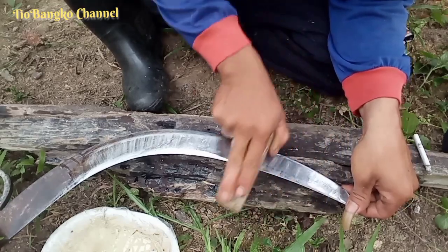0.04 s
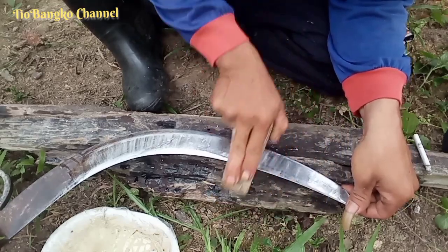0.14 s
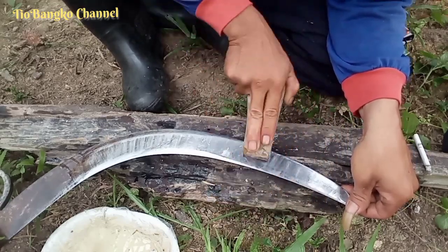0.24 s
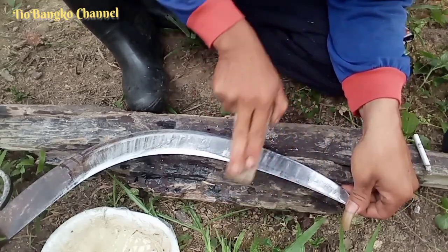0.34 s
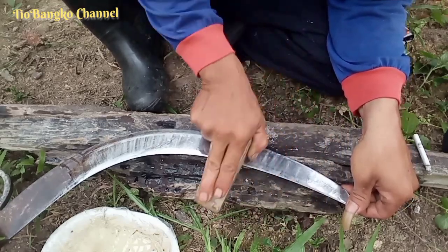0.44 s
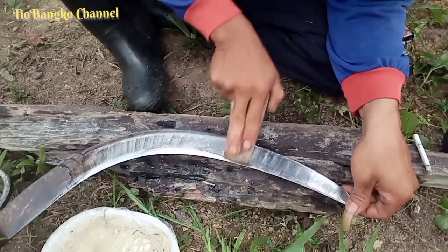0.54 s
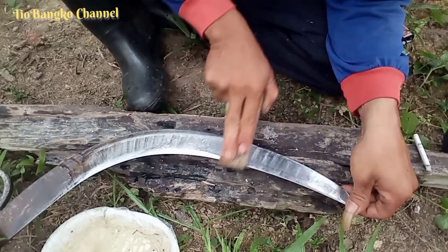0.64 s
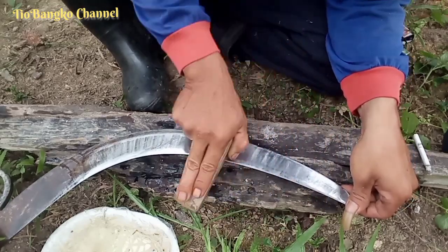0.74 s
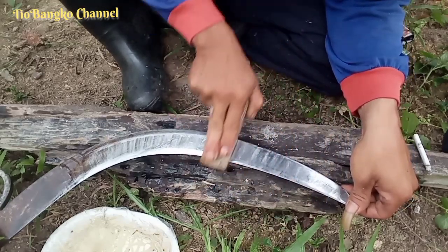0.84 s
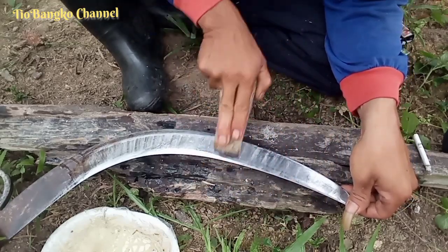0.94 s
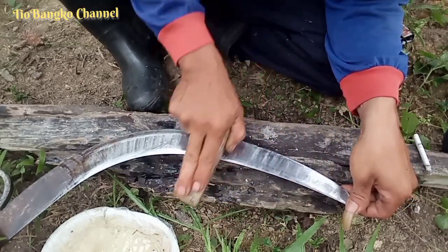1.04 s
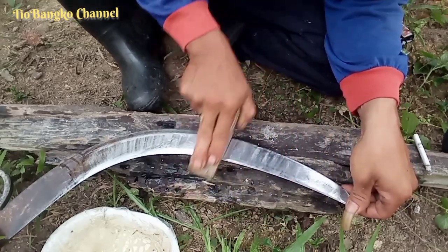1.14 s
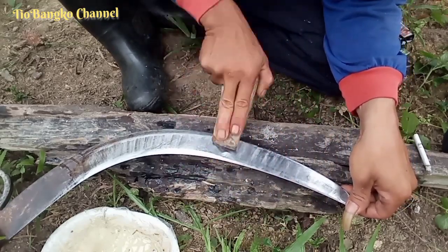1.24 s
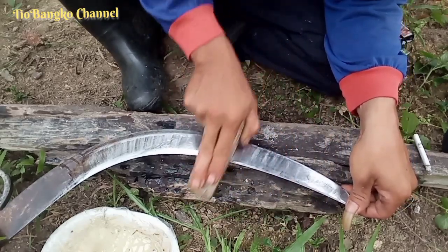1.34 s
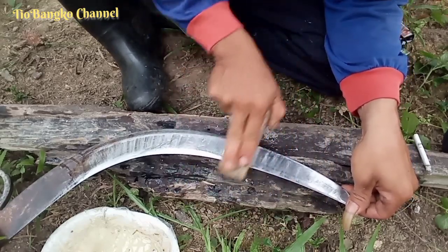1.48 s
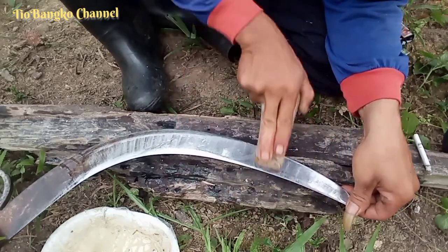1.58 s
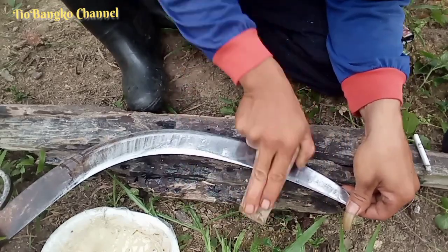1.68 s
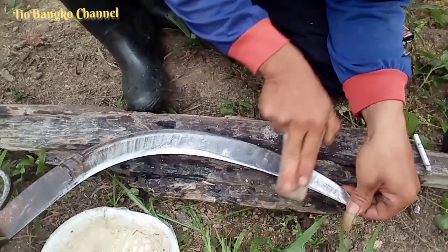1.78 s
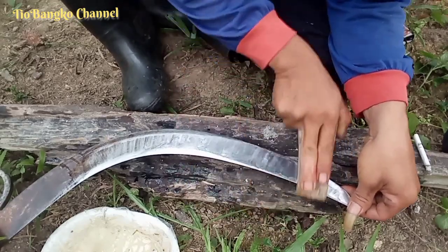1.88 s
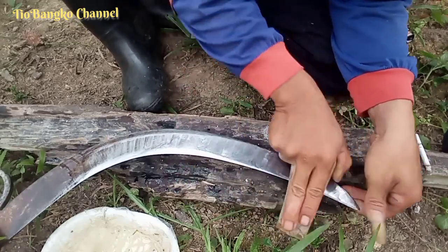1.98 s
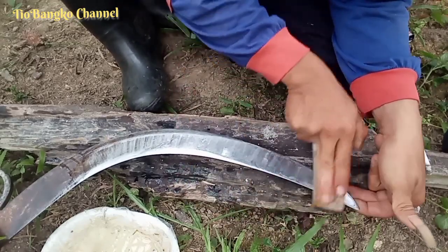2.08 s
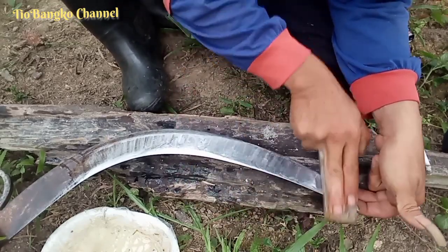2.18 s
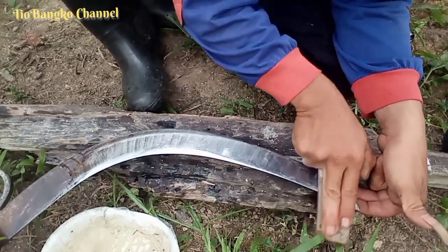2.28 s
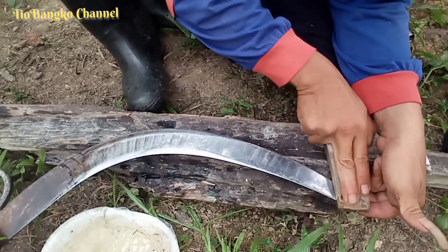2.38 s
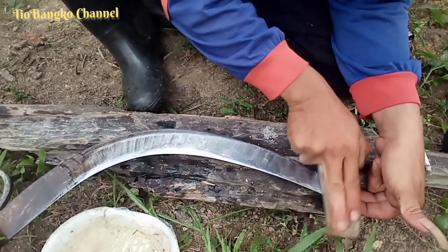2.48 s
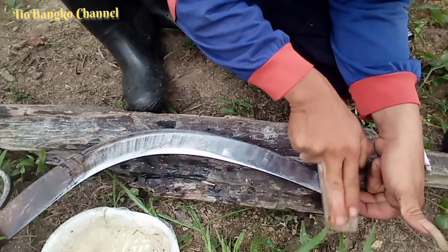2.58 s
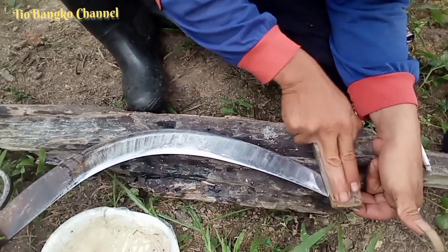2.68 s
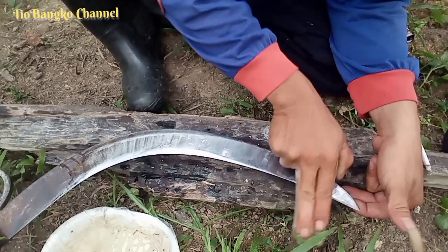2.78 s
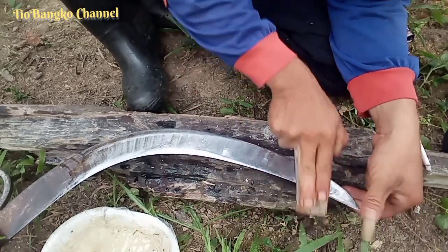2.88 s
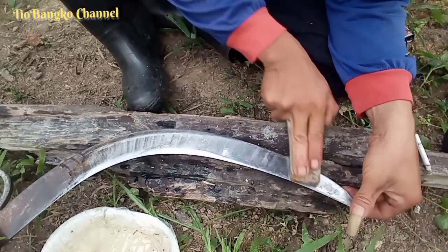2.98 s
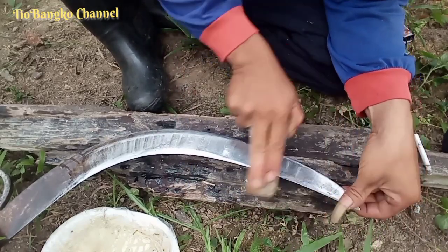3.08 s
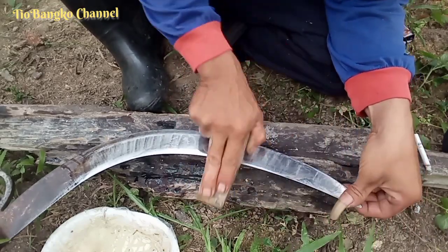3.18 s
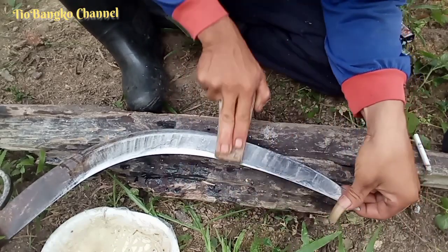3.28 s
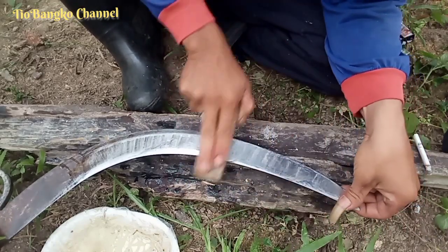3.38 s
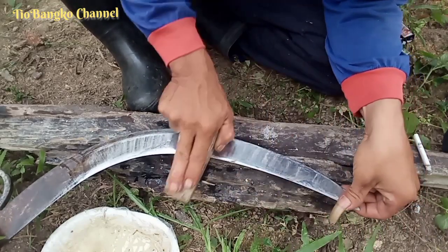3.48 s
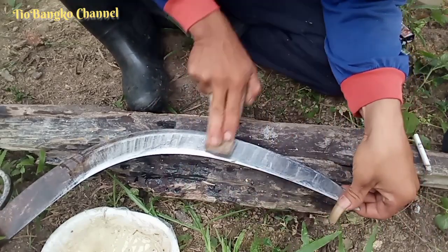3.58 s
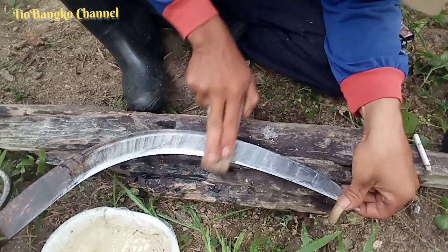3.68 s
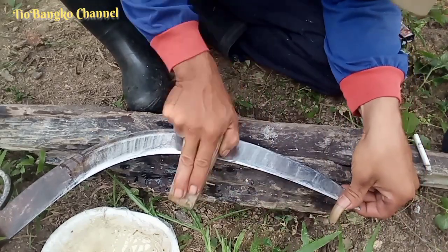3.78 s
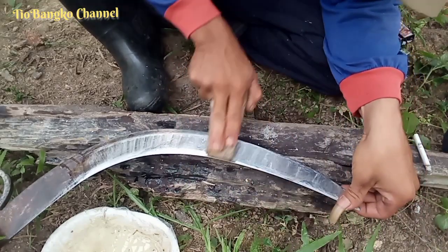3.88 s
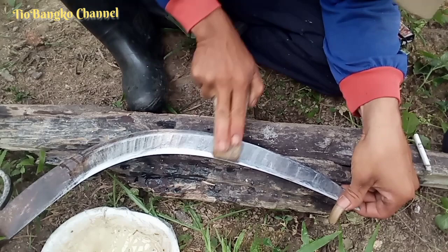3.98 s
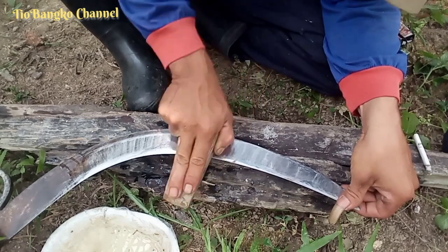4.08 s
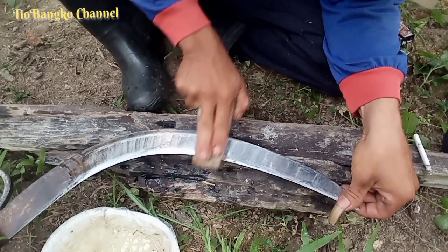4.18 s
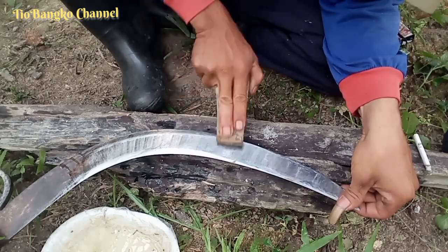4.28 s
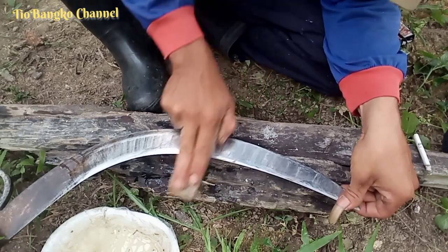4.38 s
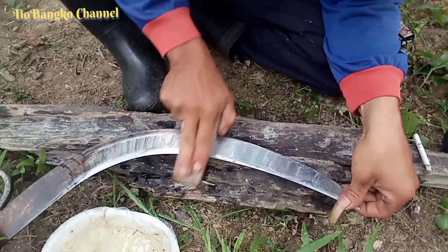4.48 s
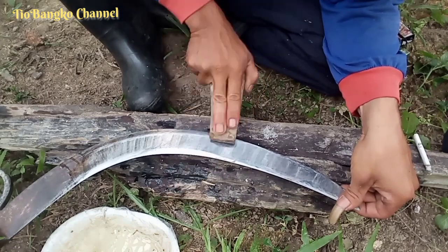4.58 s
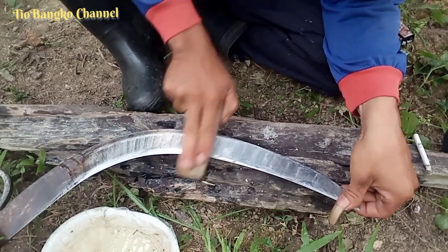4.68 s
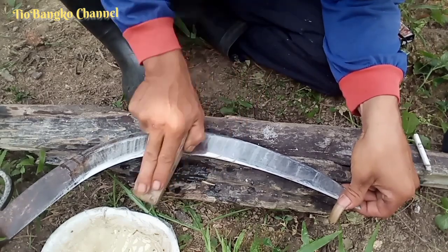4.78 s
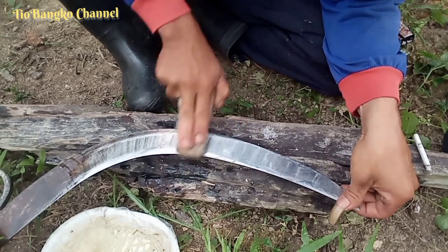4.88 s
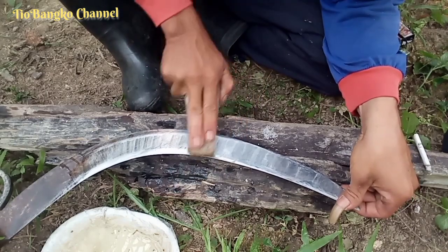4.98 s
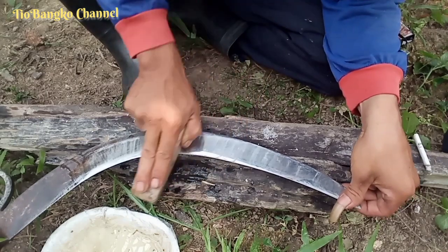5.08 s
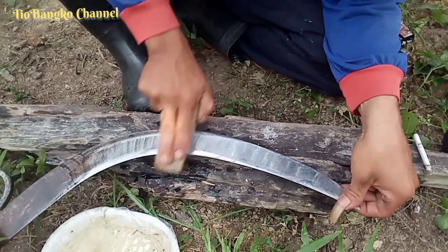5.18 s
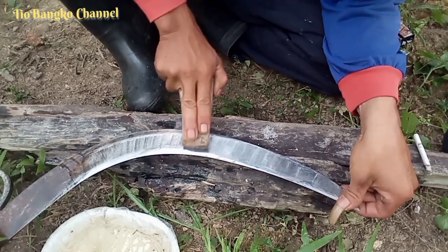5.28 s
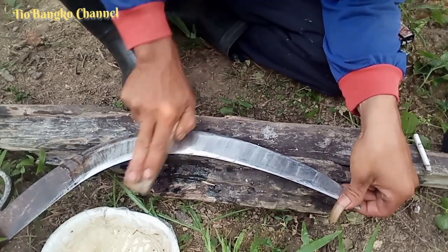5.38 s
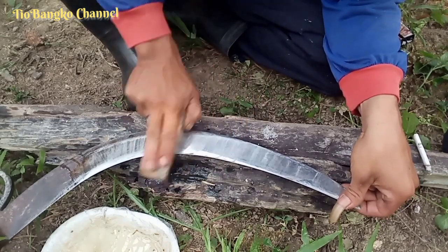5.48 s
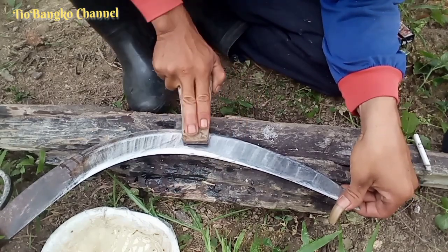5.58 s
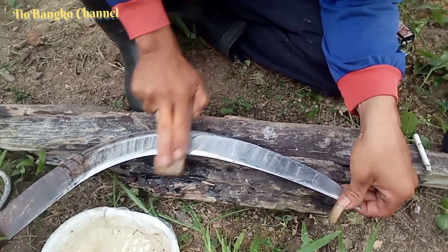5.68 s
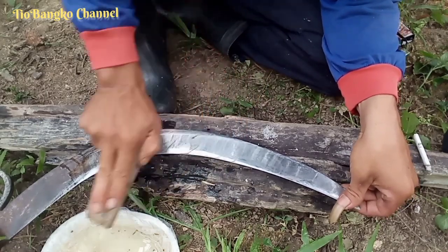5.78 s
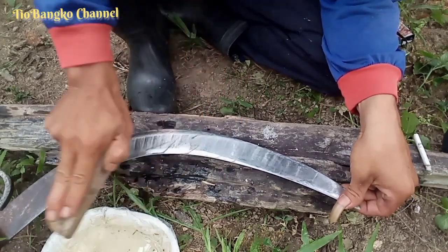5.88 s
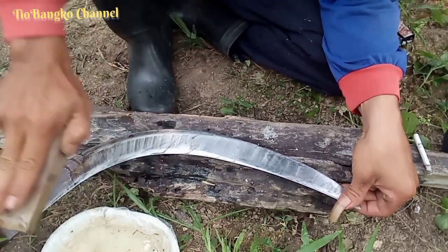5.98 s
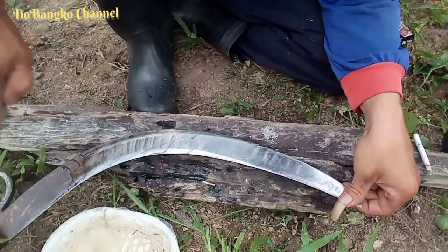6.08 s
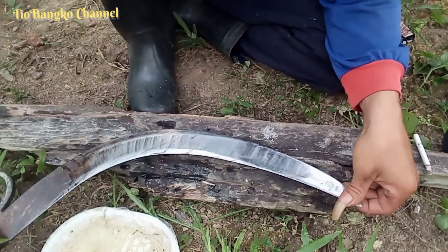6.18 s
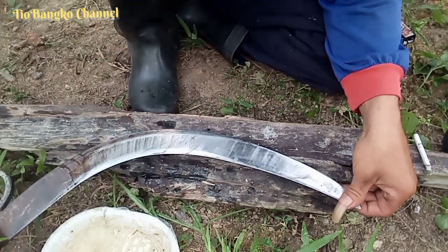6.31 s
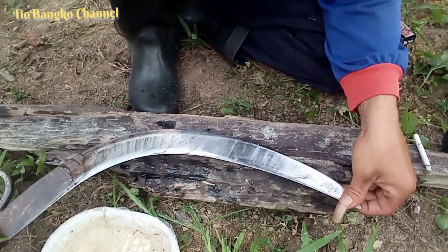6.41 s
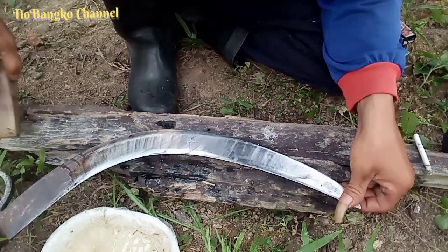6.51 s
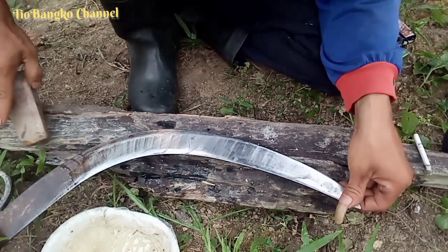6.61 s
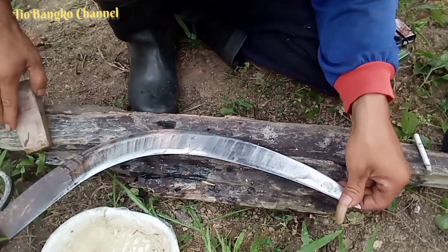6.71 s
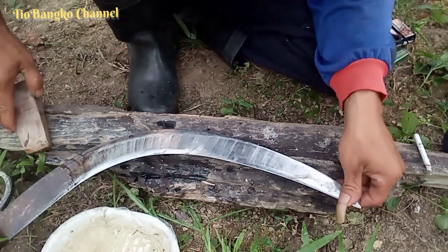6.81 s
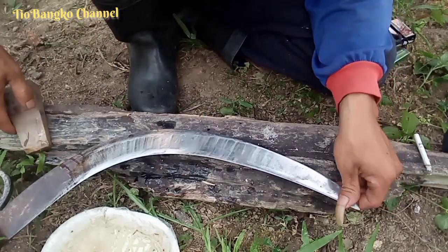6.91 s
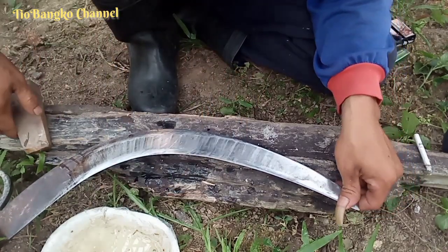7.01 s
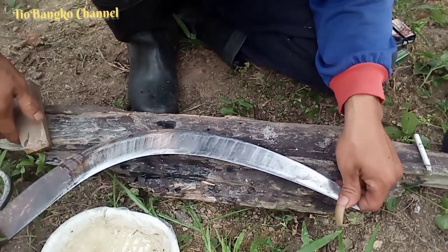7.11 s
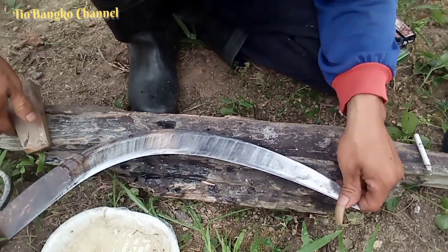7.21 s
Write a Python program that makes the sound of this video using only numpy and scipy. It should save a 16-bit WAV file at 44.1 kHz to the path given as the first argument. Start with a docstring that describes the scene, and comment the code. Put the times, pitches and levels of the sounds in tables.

```python
"""Throughout, insects buzz over a low outdoor rumble: a pulsed tone, resonant noise and coloured grains.
From the start a whetstone rasps to and fro, six strokes a second, along a curved steel blade on a plank:
random grains drive resonances of steel and wood, and the fine hiss stalls at most turns. Among the strokes
the stone clacks on the steel (decaying modes, noise), hardest once the rubbing has weakened, or squeaks.
Near 5.8 s it lifts; a faint far-off tone passes, then the stone is set down with a knock of plank modes."""
import sys
import numpy as np
from scipy import signal
from scipy.fft import rfft, irfft, next_fast_len
from scipy.io import wavfile
from scipy.ndimage import uniform_filter1d

SR = 44100
rng = np.random.default_rng(int(sys.argv[2]) if len(sys.argv) > 2 else 0)


def wav_out(sig):
    """Save sig, one row per channel (or a flat mono array), as 16-bit PCM at SR to the path in sys.argv[1]."""
    wavfile.write(sys.argv[1], SR, np.round(np.clip(np.atleast_2d(sig).T, -1, 1) * 32767).astype(np.int16))


N = 319725
TIME = np.arange(N) / SR
TOP_HZ = 15800


def amp(db):
    """Decibels to gain."""
    return 10 ** (np.asarray(db) / 20)


def unit(x, size=None):
    """Scales to rms 1, judged on the first size samples if given."""
    return x / np.sqrt(np.mean(x[:size] ** 2) + 1e-20)


def read(points, hz):
    """Interpolates a curve over log frequency."""
    f, value = np.transpose(points)
    return np.interp(np.log(hz + 1), np.log(f), value)


def follow(table, t):
    """Interpolates every column of a timed table at t seconds."""
    s, *columns = np.transpose(table)
    return [np.interp(t, s, c) for c in columns]


def add(mix, start_s, sound):
    """Mixes a sound in at start_s."""
    part = mix[max(round(start_s * SR), 0):][:len(sound)]
    part += sound[:len(part)]


def band(x, lo_hz, hi_hz, order=3):
    """Causal band-pass."""
    return signal.sosfilt(signal.butter(order, [lo_hz, hi_hz], 'band', fs=SR, output='sos'), x)


def thirds(x):
    """Splits a sound into steel, grit and plank registers that sum to the whole."""
    hz = np.fft.rfftfreq(len(x), 1 / SR)
    low = 1 / (1 + (hz / 700) ** 8)
    high = 1 - 1 / (1 + (hz / 2600) ** 12)
    return irfft(rfft(x) * np.array([1 - low - high, high, low]), len(x))


def colour(x, spectrum):
    """Filters a sound by a spectrum."""
    size = next_fast_len(len(x))
    gain = amp(read(spectrum, np.fft.rfftfreq(size, 1 / SR)))
    return irfft(rfft(x, size) * gain, size)[:len(x)]


def phase(hz):
    """Phase in radians of a moving pitch."""
    return 2 * np.pi * np.cumsum(hz) / SR


def wander(per_s):
    """Random curve of rms 1: straight lines between per_s points a second."""
    return unit(np.interp(TIME * per_s, np.arange(8000), rng.standard_normal(8000)))


def resonate(x, hz, width_hz):
    """A resonance of gain 1 whose pitch may move."""
    turn = np.exp(1j * phase(hz * np.ones(len(x))))
    r = np.exp(-np.pi * width_hz / SR)
    return 2 * (turn * signal.lfilter([1 - r], [1, -r], x / turn)).real


def grit(per_s, spread_db, patchy_db):
    """Countless grains catch and break; narrow bands flare and fade as the contact shifts."""
    size_db = spread_db * np.minimum(rng.exponential(1, N), 4)
    grains = (rng.random(N) < per_s / SR) * rng.standard_normal(N) * amp(size_db)
    z = signal.stft(grains, nperseg=1024, noverlap=768)[2]
    blur = np.outer(np.hanning(6), np.hanning(20))  # bins x frames
    patches = unit(signal.fftconvolve(rng.standard_normal(z.shape), blur, 'same'))
    return unit(signal.istft(z * amp(patchy_db * patches), nperseg=1024, noverlap=768)[1][:N])


# outdoor rumble and rustle: freq_hz, relative_db_per_hz
YARD_SPECTRUM = [(25, -40.5), (70, 3), (141, 12.5), (250, -4), (450, -10), (800, -17), (1500, -6),
                 (2900, -2.5), (5400, -15), (7300, -39), (9500, -39.5), (16000, -44.5)]


def yard(air_db=-57, hoot_hz=603, hoot_db=-68):
    """Low outdoor rumble under a thin, shifting rustle, and one faint far-off tone of resonant noise."""
    air = colour(grit(per_s=SR, spread_db=3.0, patchy_db=3.5), YARD_SPECTRUM)
    hoot = unit(resonate(resonate(rng.standard_normal(N), hoot_hz, 43), hoot_hz, 40))
    hoot *= np.exp(-((TIME - 6.22) / 0.12) ** 4)
    return amp(air_db + 1.0 * wander(2.7)) * unit(air) + amp(hoot_db) * hoot


def insects(near_hz=7290, throb_hz=22.3, click_hz=100, near_db=-61, chorus_db=-62, overtone_db=-81):
    """A near insect buzzes in throbs of quick pulses over a smooth chorus of resonant noise."""
    throb = 1 + .55 * np.cos(phase(throb_hz * (1 + .02 * wander(3))))
    clicks = 1 + .75 * np.cos(phase(click_hz * (1 + .05 * wander(40))))
    near = throb * clicks * np.sin(phase(near_hz + 140 * wander(700)))
    chorus = resonate(resonate(rng.standard_normal(N), 7000, 850), 7000, 850)
    overtone = band(rng.standard_normal(N), 14000, 15200, order=1)
    return amp(near_db) * unit(near) + amp(chorus_db) * unit(chorus) + amp(overtone_db) * unit(overtone)


# strokes, back and out by turns, each until the next; levels when pressed hardest, before smoothing:
# start_s, steel_db, rasp_db, plank_db
STROKES_PRESSED = [(-.05, -39, -43.5, -36.5), (0.09, -35.5, -40.5, -33.5), (.249, -38.5, -43.5, -34.5),
                   (0.411, -32, -44, -38.5), (0.571, -40, -44.5, -37.5), (.732, -36, -44, -38.5),
                   (0.896, -39, -44.5, -39), (1.057, -37, -43.5, -39.5), (1.223, -40, -44, -38),
                   (1.381, -35.5, -41.5, -41.5), (1.54, -39.5, -40.5, -37), (1.687, -38.5, -41, -44),
                   (1.839, -42.5, -41.5, -39.5), (1.981, -32, -40, -37), (2.127, -36, -38, -38.5),
                   (2.264, -30, -36.5, -33.5), (2.402, -29, -35.5, -36), (2.531, -26.5, -34.5, -36),
                   (2.671, -32, -38, -36), (2.814, -37, -41, -38), (2.96, -40, -41.5, -46),
                   (3.135, -41.5, -43.5, -46), (3.291, -40.5, -44.5, -37), (3.438, -38, -42, -36),
                   (3.599, -47, -42.5, -48), (3.756, -40.5, -43.5, -37.5), (3.917, -51, -44, -41.5),
                   (4.081, -40.5, -42, -38), (4.247, -48, -41, -42), (4.41, -43, -43.5, -43.5),
                   (4.585, -41, -45, -33), (4.775, -40.5, -43, -43), (4.934, -48, -40, -46),
                   (5.103, -49, -42.5, -52.5), (5.264, -47, -39.5, -44.5), (5.422, -53, -41.5, -53),
                   (5.595, -47, -41.5, -45)]
LAST_STROKE_END_S = 5.785
# how far the fine hiss drops at a turn; hardly at all when the stone swings round in a loop: time_s, depth_db
STALL_DEPTH = [(0, 17), (1.2, 25), (1.55, 7), (1.95, 7), (2.2, 18), (2.7, 21), (2.95, -2), (3.15, 0),
               (3.3, 16), (4.25, 19), (4.41, 7), (4.58, 13), (4.77, 2), (4.93, 13), (5.42, 15), (5.6, 10)]
# moment and spread of hardest pressing, as shares of a stroke
PRESS_OUT, PRESS_BACK, PRESS_WIDTH = 0.58, 0.52, 0.29


def stroking(stall_s=0.0075, blend_s=0.059, gliding_db=-46.5, rasp_ease_db=3, plank_ease_db=15):
    """The hand bears down in mid-stroke and eases to a glide at the turns: steel, rasp, plank, stall in dB."""
    start_s, *levels_db = np.transpose(STROKES_PRESSED)
    last = len(start_s) - 1
    strokes_done = np.interp(TIME, np.append(start_s, LAST_STROKE_END_S), np.arange(last + 2))
    stroke = np.minimum(strokes_done.astype(int), last)
    press_at = np.where(stroke % 2, PRESS_OUT, PRESS_BACK)
    ease = 1 - np.exp(-((strokes_done - stroke - press_at) / PRESS_WIDTH) ** 2)
    steel_db, rasp_db, plank_db = uniform_filter1d(np.array(levels_db)[:, stroke], round(blend_s * SR))
    steel_db = steel_db + (gliding_db - steel_db) * ease
    rasp_db = rasp_db - rasp_ease_db * ease
    plank_db = plank_db - plank_ease_db * ease
    from_turn_s = TIME - start_s[np.minimum(np.round(strokes_done).astype(int), last)]
    stall_db = follow(STALL_DEPTH, TIME)[0] * np.exp(-(from_turn_s / stall_s) ** 2 / 2)
    return steel_db, rasp_db, plank_db, stall_db


# blade modes, also struck by the clacks: freq_hz, relative_db, t60_s (when struck)
BLADE_MODES = [(242, -11, .25), (342, -13, .2), (560, -13, .08), (982, -10, .23), (1408, -6, .11),
               (1719, -5.5, .14), (2052, 0, .16), (2255, -9, .07), (2457, -12, .1), (2755, -11, .1),
               (2910, -11, .1), (3050, -11, .07), (3480, -16, .07), (3740, -14, .08), (4110, -16, .08)]


def steel_modes(drive, sway_db=5.0, width_hz_s=1.76):
    """The sliding stone favours now one mode of the blade, now another."""
    total = np.zeros(N)
    for hz, db, t60_s in BLADE_MODES:
        gain = amp(db + sway_db * wander(14)) * np.sqrt(t60_s)
        total += gain * resonate(drive, hz, width_hz_s / t60_s)
    return unit(total)


# grip of stone and hand along the blade, also heard in the clacks:
# time_s, loaded_hz (mode the stone loads), free_db (freedom to ring), wood_hz (wood beneath)
GRIP_ALONG_BLADE = [(0, 1063, 0, 270), (1.3, 1102, 3, 277), (1.8, 822, -4.5, 697), (2.2, 1102, -6, 633),
                    (2.9, 923, -3, 610), (3.65, 1160, 0, 313), (4.0, 1128, -0.5, 250),
                    (4.33, 1164, 0.5, 320), (4.66, 1290, -0.5, 248), (5.0, 1318, -7, 311),
                    (5.31, 1377, -5, 314), (5.5, 1290, -3, 360), (5.63, 1110, -5, 582)]
# rasp of grit on steel: freq_hz, relative_db_per_hz
SCRAPE_SPECTRUM = [(60, -26), (130, -7), (190, -5.5), (240, 0.5), (400, 0), (550, -20), (780, -6),
                   (1120, -6), (1550, -8), (2050, -4), (2550, -9), (4180, -8), (8000, -24), (10400, -50)]
# finest hiss: freq_hz, relative_db_per_hz
FIZZ_SPECTRUM = [(4000, -36), (6000, 13.5), (7200, -18), (8850, 15.5), (9600, -7.5), (11000, -1.5),
                 (12100, 14), (13000, -3), (15800, 10.5)]


def rubbing(lift_s=5.75, modes_db=-2.0, loaded_db=-8, wood_db=-11, fizz_db=-52):
    """Grit drives the blade and the plank under it; the finest hiss drops most when the hand turns."""
    loaded_hz, free_db, wood_hz = follow(GRIP_ALONG_BLADE, TIME)
    steel_db, rasp_db, plank_db, stall_db = stroking()
    contact = amp(-500 * np.maximum(TIME - lift_s, 0))  # dB per s after the lift
    judder = amp(2.07 * wander(110))  # the stone skips a little over the steel
    drive = grit(per_s=16000, spread_db=1.7, patchy_db=4.3)
    # the stone rocks as it slides: its mode shifts, comes and goes
    rocking_hz = loaded_hz * (1 + .04 * wander(18))
    loaded = unit(resonate(drive, rocking_hz, 55) * amp(4 * wander(16)))
    ring = amp(modes_db + free_db) * steel_modes(drive) + amp(loaded_db + free_db / 2) * loaded
    wood = amp(wood_db) * unit(resonate(resonate(drive, wood_hz, 210), wood_hz, 264))
    scrape = unit(colour(drive, SCRAPE_SPECTRUM))
    steel, rasp, plank = (unit(x) for x in thirds(scrape + ring + wood))
    # steel rings on through a stall better than the rasp
    body = steel * amp(steel_db - .15 * stall_db)
    body += rasp * amp(rasp_db - .35 * stall_db)
    body += plank * amp(plank_db)
    fizz = unit(colour(grit(per_s=16000, spread_db=0.8, patchy_db=5.0), FIZZ_SPECTRUM))
    fizz *= amp(fizz_db - stall_db + .5 * (rasp_db - np.mean(rasp_db)))  # swells with the rasp
    return contact * judder * (body + fizz)


def burst(spectrum, t60s, t):
    """A dense ring that starts at once and dies at its own speed in each band."""
    noise = colour(rng.standard_normal(len(t)), spectrum)
    hz, s, z = signal.stft(noise, SR, nperseg=128)
    decay = amp(-60 * s / read(t60s, hz)[:, None])
    return signal.istft(z * decay, SR, nperseg=128)[1][:len(t)]


# stone strikes blade: start_s, steel_db, edge_db (hard edge), plank_db
CLACK_BLOWS = [(0.1732, -32, -41, -34.5), (0.493, -28, -32.5, -37), (0.818, -27.5, -46.5, -42),
               (1.145, -29.5, -45.5, -46), (1.47, -33.5, -38.5, -50), (1.489, -46, -46, -38),
               (1.774, -31.5, -58, -45), (1.899, -42.5, -42, -38.5), (2.069, -30.5, -41, -35.5),
               (2.1732, -20.5, -26.5, -29.5), (2.426, -27, -34.5, -44), (2.699, -26, -29, -35.5),
               (3.0417, -28.5, -31, -26), (3.223, -34.5, -44, -39), (3.244, -37.5, -57, -30.5),
               (3.525, -29.5, -49.5, -46.5), (3.6556, -18, -18, -32), (3.674, -18.5, -23, -27.5),
               (3.841, -30, -55.5, -35), (3.9726, -21, -22.5, -32), (3.999, -18.5, -24.5, -32),
               (4.153, -24, -30.5, -34.5), (4.302, -19.5, -24, -25), (4.334, -19, -20, -34),
               (4.505, -37.5, -68, -32.5), (4.6448, -19.5, -22, -32.5), (4.671, -23.5, -30, -38),
               (4.86, -33, -56, -33), (4.9816, -20, -26, -36.5), (5.016, -34, -41, -35),
               (5.183, -27, -34.5, -33.5), (5.214, -38.5, -65, -33.5), (5.3055, -22, -26, -37),
               (5.334, -31, -36, -37.5), (5.491, -20.5, -25.5, -38.5), (5.543, -40, -56, -38),
               (5.6293, -22, -30, -32), (5.6828, -20, -24.5, -33.5)]
# dense ring of blade and plank: freq_hz, relative_db_per_hz
CLACK_SPECTRUM = [(90, -12), (160, -11.5), (240, 7), (520, -8), (750, -2.5), (1200, -1.5), (2100, 1.5),
                  (3000, -5.5), (3250, -14), (3900, -7), (4800, -14.5), (6500, -24.5), (9000, -40.5),
                  (15000, -44)]
# its decay: freq_hz, t60_s
CLACK_DECAY = [(200, 0.11), (700, 0.08), (2000, 0.088), (4000, 0.078), (9000, 0.1)]


def clacks(modes_db=2.0, loaded_db=0, loaded_t60_s=0.12, wood_db=-9, wood_t60_s=0.077,
           crack=0.51, hard_hz=9000, dulling=0.91, muffling=0.17):
    """Each blow cracks, then leaves the blade's modes ringing as freely as the grip allows."""
    out, t = np.zeros(N), np.arange(SR // 3) / SR
    first_ms, attack = np.exp(-t / .003), 1 - np.exp(-t / .0003)
    for start_s, steel_db, edge_db, plank_db in CLACK_BLOWS:
        loaded_hz, free_db, wood_hz = follow(GRIP_ALONG_BLADE, start_s)
        gripped = [(loaded_hz, loaded_db, loaded_t60_s), (wood_hz, wood_db - free_db, wood_t60_s)]
        hz, db, t60_s = np.transpose(list(BLADE_MODES) + gripped)[:, :, None]
        share_db = 3.2 * rng.standard_normal(hz.shape)  # the point of impact sets each mode's share
        tones = np.sin(2 * np.pi * (hz * t + rng.random(hz.shape)))
        ring = (amp(db + share_db - 60 * t / t60_s) * tones).sum(0)
        dense = burst(CLACK_SPECTRUM, CLACK_DECAY, t) * (1 + crack * first_ms)
        hardness_db = edge_db - steel_db
        top_hz = min(hard_hz * amp(dulling * hardness_db), SR / 3)  # a flat, soft blow is dull
        ring_db = modes_db + free_db + muffling * hardness_db  # the lingering stone damps the ring
        whole = unit(dense, size=530) + amp(ring_db) * unit(ring, size=530)
        steel, edge, plank = thirds(band(whole, 85, top_hz, order=2))
        blow = amp(steel_db) * unit(steel, size=530) + amp(edge_db) * unit(edge, size=530)
        blow += amp(plank_db) * unit(plank * (1 - first_ms), size=900)
        add(out, start_s, (blow * attack)[:SR // 4])
    return band(out, 182, TOP_HZ, order=2)  # keeps the clacks free of deep bass


# stone sticks and squeaks: centre_s, pitch_hz, peak_db
SQUEAK_MOMENTS = [(.766, 4050, -35.5), (2.366, 1730, -28), (2.975, 2750, -36.5)]


def squeaks(half_s=0.024, waver_hz=70):
    """Stick and slip lock on to one resonance for a moment: a wavering tone that swells and fades."""
    out = np.zeros(N)
    for centre_s, pitch_hz, peak_db in SQUEAK_MOMENTS:
        swell = np.exp(-((TIME - centre_s) / half_s) ** 2)
        out += amp(peak_db) * swell * np.sin(phase(pitch_hz + waver_hz * wander(400)))
    return out


# knocks on the plank: start_s, thump_db, click_db (gritty), contact_s
PLANK_KNOCKS = [(5.921, -54, -48.5, 0.012), (5.966, -45, -64, 0.0031), (6.416, -40.5, -58, 0.0027),
                (6.625, -16, -32, 0.0011), (6.6423, -22.5, -25, 0.0017), (6.652, -23, -35, 0.0027),
                (6.892, -40, -69, 0.006), (6.934, -46, -64, 0.0046)]
# plank modes: freq_hz, relative_db, t60_s
PLANK_MODES = [(145.6, -18.5, 0.14), (246.5, -1.5, 0.069), (286.6, -7.5, 0.11), (388, -6.5, 0.078),
               (452, 11, 0.028), (520, -0.5, 0.041), (588, -9, 0.13), (800, -14, 0.1), (1240, -18.5, 0.084),
               (1650, -2, .035)]
# gritty click: freq_hz, relative_db_per_hz
CLICK_SPECTRUM = [(200, 7.5), (700, 9), (1700, 5.5), (2800, 2), (4500, -17.5), (14000, -37)]
# grit scuffs and ticks: start_s, level_db, t60_s
GRIT_SCUFFS = [(5.915, -47, 0.48), (6.594, -32.5, 0.024), (6.603, -43, 0.3), (7.063, -61, .02)]
# their colour: freq_hz, relative_db_per_hz
SCUFF_SPECTRUM = [(700, -26), (1800, -4.5), (3500, 2), (6000, -15), (9000, -27), (15000, -32.5)]


def putting_down():
    """The stone scuffs, drops and rocks to rest; a long, soft contact cannot drive the high modes."""
    out, t = np.zeros(N), np.arange(SR // 3) / SR
    for start_s, thump_db, click_db, contact_s in PLANK_KNOCKS:
        wood = np.zeros(len(t))
        for hz, db, t60_s in PLANK_MODES:
            softening = np.hypot(1, (hz * contact_s / 2) ** 2)
            wood += amp(db - 60 * t / t60_s) * np.sin(2 * np.pi * hz * t) / softening
        click = colour(rng.standard_normal(len(t)), CLICK_SPECTRUM)
        click *= amp(-60 * t / 0.015) + 0.026 * amp(-60 * t / 0.23)
        rise = 1 - np.exp(-(t / contact_s) ** 2)
        thump = amp(thump_db) * unit(-wood * rise, size=400)
        add(out, start_s, thump + amp(click_db) * unit(click * rise, size=300))
    for start_s, level_db, t60_s in GRIT_SCUFFS:
        scuff = unit(colour(rng.standard_normal(len(t)), SCUFF_SPECTRUM))
        add(out, start_s, scuff * amp(level_db - 60 * t / t60_s))
    return band(out, 137, TOP_HZ, order=3)


def scene():
    """All sources summed on one channel, close and in the open air."""
    return (yard() + insects() + rubbing() + clacks() + squeaks() + putting_down())[None]


def record(dry):
    """The recorder's band limit: a linear-phase low-pass."""
    lowpass = signal.firwin(511, TOP_HZ, window=("kaiser", 9), fs=SR)
    return signal.oaconvolve(dry, lowpass[None], "same")


dry = scene()
out = record(dry)
wav_out(out)
```